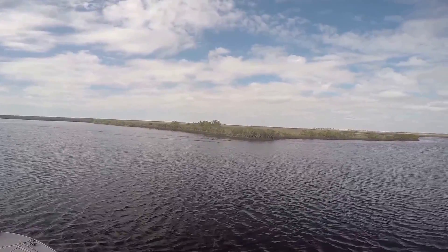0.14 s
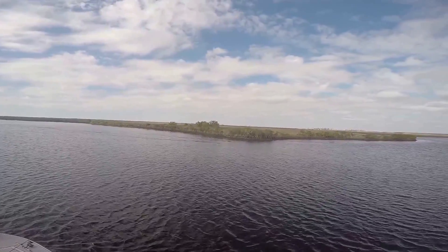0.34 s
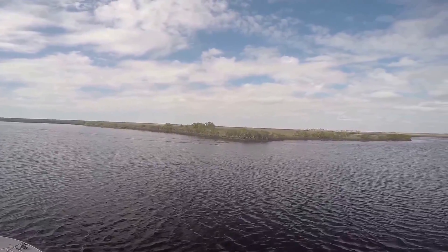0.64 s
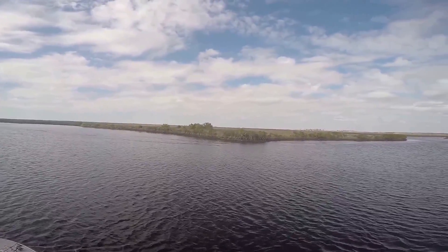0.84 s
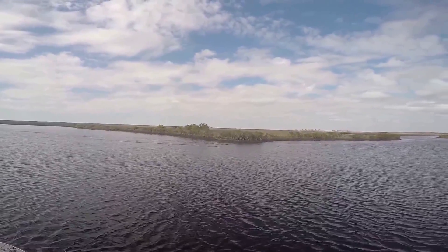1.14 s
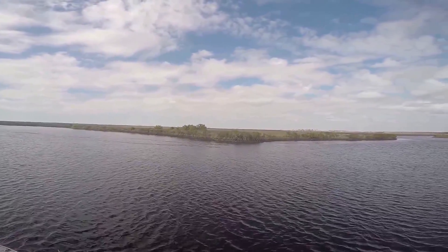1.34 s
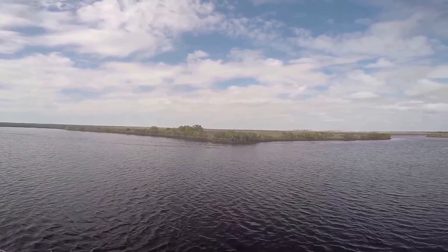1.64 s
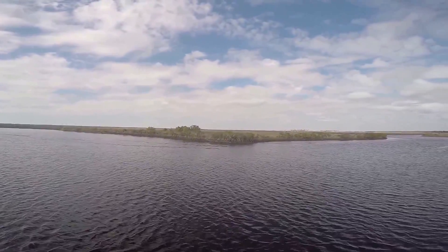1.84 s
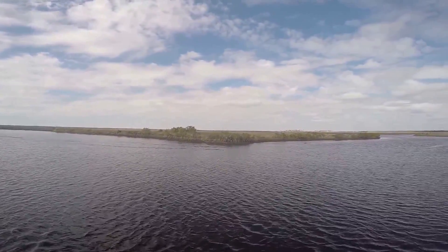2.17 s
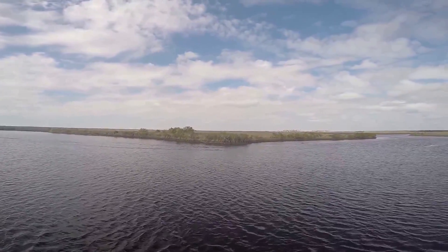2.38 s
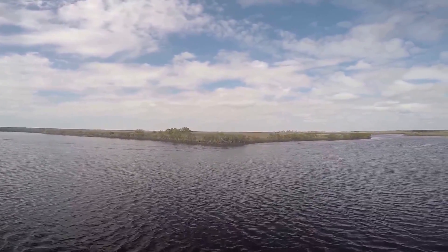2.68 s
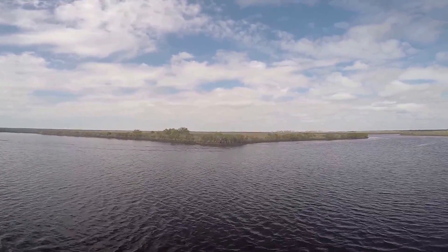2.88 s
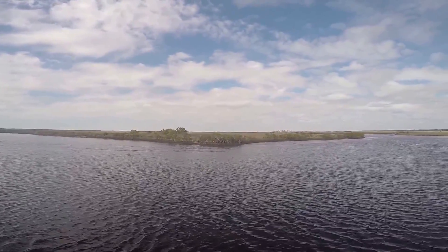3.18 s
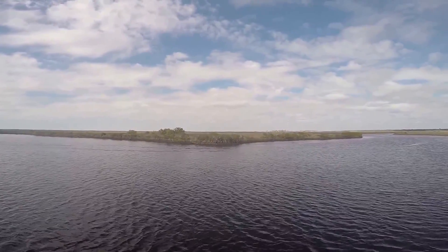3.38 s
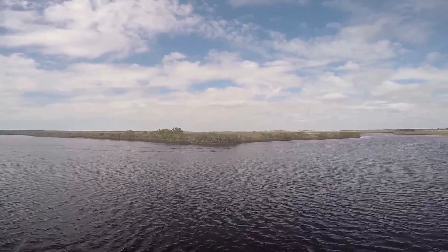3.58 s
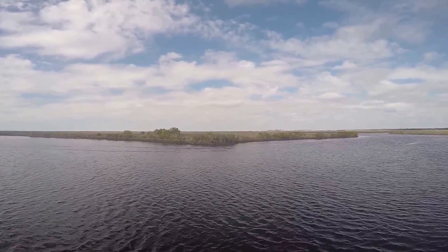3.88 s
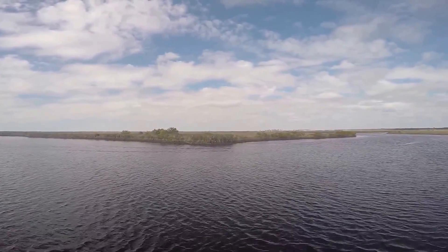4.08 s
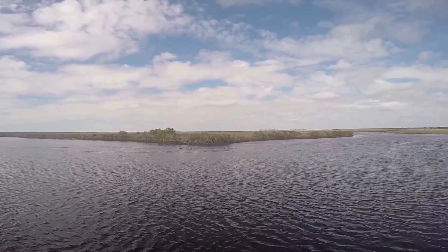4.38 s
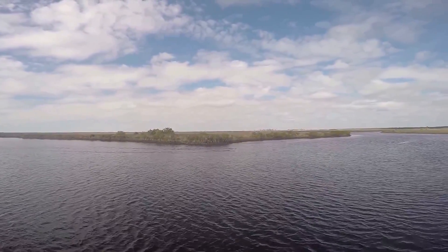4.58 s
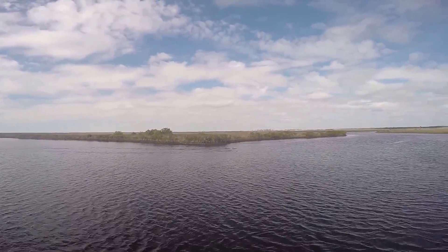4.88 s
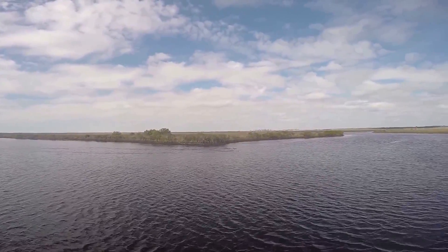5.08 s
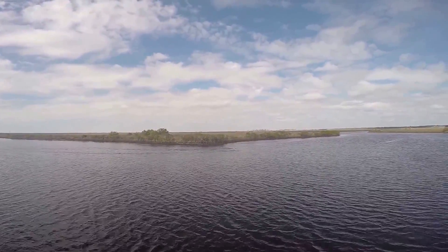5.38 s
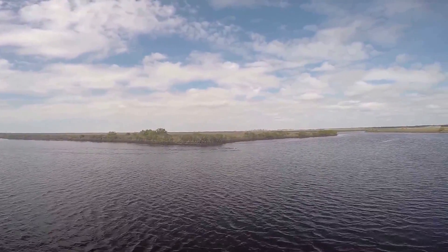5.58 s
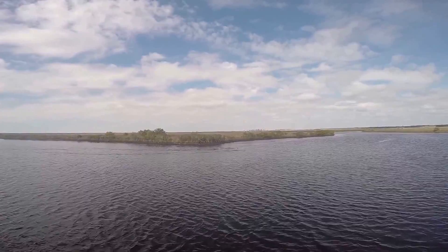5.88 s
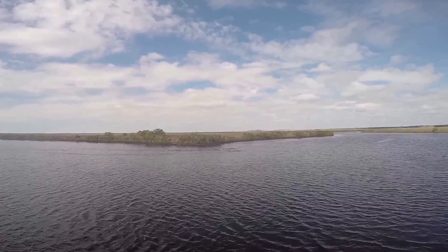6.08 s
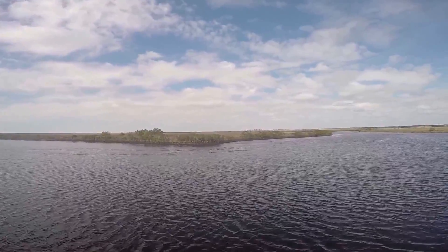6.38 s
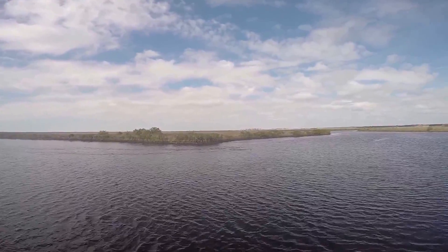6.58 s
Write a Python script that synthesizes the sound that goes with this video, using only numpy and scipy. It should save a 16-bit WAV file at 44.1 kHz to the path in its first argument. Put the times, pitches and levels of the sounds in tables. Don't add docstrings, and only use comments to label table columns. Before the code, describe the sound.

Low water rumble, soft slaps, gurgle and faint surging wash run throughout, with slight hiss. From about three quarters of a second, uneven knocks dominate: bassy thumps topped by tiny scratchy plastic clicks, varying in strength and brightness. They come quickly at first, then clicks weaken and gaps widen, dull muffled bumps joining late. Close, boxy, muffled mono sound, outdoors on the water, no echo.

```python
import sys
import numpy as np
from scipy import signal
from scipy.fft import rfft, irfft, next_fast_len
from scipy.io import wavfile
from scipy.ndimage import uniform_filter1d, map_coordinates

SR = 44100
rng = np.random.default_rng(int(sys.argv[2]) if len(sys.argv) > 2 else 0)


def volts(x):
    e = np.asarray(x, float) / 20
    return 10 ** e


def master(y):
    cut = np.clip(np.atleast_2d(y).T, -1, 1)
    pcm = np.round(cut * 32767)
    wavfile.write(sys.argv[1], SR, pcm.astype(np.int16))


N = 296616


def unit(x):
    return x / np.sqrt(np.mean(x ** 2) + 1e-20)


def wobble(rate):
    points = rng.standard_normal(int(N * rate / SR) + 4)
    return map_coordinates(points, [np.arange(N) * rate / SR])


def filtered(x, response):
    m = next_fast_len(N + 8192)
    return irfft(rfft(x, m) * response(np.fft.rfftfreq(m, 1 / SR)), m)[:N]


def ringing(x, modes):
    def shape(f):
        total = 0
        for k, (centre, width, db) in enumerate(modes):
            damping = 1j * f * width
            total = total + (-1) ** k * volts(db) * damping / (centre ** 2 - f ** 2 + damping)
        return total
    return filtered(x, lambda f: shape(f) / np.sqrt(np.mean(np.abs(shape(f)) ** 2)))


def push(ms):
    return np.hanning(max(round(ms * SR / 1000), 3))


def rush(spectrum, patchy_db):
    z = signal.stft(rng.standard_normal(N), nperseg=512)[2]
    patches = uniform_filter1d(rng.standard_normal(z.shape), size=6, axis=0)
    patches = uniform_filter1d(patches, size=8, axis=1)
    noise = signal.istft(z * volts(patchy_db * unit(patches)), nperseg=512)[1][:N]
    f, level = np.transpose(spectrum)

    def colour(hz):
        return volts(np.interp(np.log(hz + 1), np.log(f), level, left=-120, right=-120))
    return unit(filtered(noise, colour))


# (time [s], strength [dB], stiffness [pitch ratio], push length [ms])
JOLTS = [(0.7564, -8.2, 0.986, 15.2), (0.962, -9.0, 0.982, 3.0), (1.1457, -11.2, 1.104, 22.0),
         (1.3563, -13.3, 1.067, 3.0), (1.5337, -10.7, 0.984, 3.0), (1.7344, -10.8, 1.045, 8.3),
         (1.9228, -14.9, 1.017, 3.0), (2.1541, -14.2, 1.027, 3.0), (2.5666, -10.7, 0.995, 3.0),
         (2.7677, -13.0, 0.98, 9.1), (2.9755, -12.6, 1.089, 20.5), (3.1997, -13.5, 1.004, 7.8),
         (3.414, -15.9, 1.052, 5.9), (3.64, -15.9, 0.995, 19.2), (3.9005, -15.3, 0.993, 3.0),
         (4.113, -14.3, 0.993, 3.0), (4.3274, -13.2, 1.023, 7.6), (4.5829, -28.8, 1.097, 3.0),
         (4.7728, -10.4, 1.029, 3.0), (4.9721, -11.6, 1.011, 20.9), (5.2231, -13.1, 1.004, 3.0),
         (5.4567, -9.5, 1.035, 19.4), (5.9412, -11.0, 1.15, 24.1), (6.4447, -5.9, 0.983, 12.4)]
# (pitch [Hz], share [amplitude], time to fall 60 dB [s])
HULL_MODES = [(21.9, -.787, .216), (49.6, -3.3, .145), (41.85, 4.63, .084)]


def thumps():
    out, t = np.zeros(N + SR), np.arange(SR // 4) / SR
    for s, db, stiff, ms in JOLTS:
        ring = np.zeros(len(t))
        for hz, share, t60 in HULL_MODES:
            ring += share * np.sin(2 * np.pi * hz * stiff * t) * volts(-60 * t * stiff / t60)
        force = push(ms)
        thump = signal.fftconvolve(ring, force / force.sum())[:len(t)]
        out[round(s * SR):][:len(t)] += volts(db) * thump
    return out[:N]


# (time of peak [s], level [dB], rise [ms], fall [ms], wall part [dB])
GRATES = [(0.7608, -38, 3.6, 7.6, 4), (0.9611, -28, 2.1, 8.7, -7), (1.1499, -27.5, 1.4, 8, -7.5),
          (1.3525, -24.5, 1.8, 8.4, -0.5), (1.534, -25.5, 4.9, 6.1, -2), (1.7375, -27.5, 10.1, 4.4, -5),
          (1.9224, -34.5, 4.8, 7, -1.5), (2.1563, -23.5, 2.4, 2.9, 5), (2.564, -34, 2.4, 11.8, -2),
          (2.768, -28.5, 5.9, 11.1, -9), (2.985, -31, 12.8, 6.9, -13), (3.1958, -23, 0.83, 12, -9),
          (3.4076, -28, 13.6, 10.3, -6.5), (3.643, -36.5, 11.5, 15, -8), (3.893, -30.5, 3.6, 12.2, -1),
          (4.112, -33, 10, 8.5, -1), (4.3301, -31, 7.3, 4.6, 1.5), (4.774, -39.5, 12, 8.5, -8),
          (4.975, -40.5, 1.8, 16.6, -9), (5.2214, -39.5, 1.47, 11.4, 2), (5.946, -34.5, 4, 5.9, 8),
          (6.171, -42.5, 3.7, 4.2, 9.5), (6.4409, -32, 3.5, 2.3, 2)]
# (time of peak [s], level [dB], rise [ms], fall
# [ms], bright part [dB])
MORE_GRATES = [(0.845, -65, 3.7, 5.0, -1), (0.959, -38.5, 1.1, 12, -32), (3.345, -47, 6.8, 8.0, -15),
               (3.871, -42, 3.8, 10, -7), (4.548, -39.5, 4.5, 17, -23), (4.7683, -34, 1.6, 2.2, -36),
               (4.9545, -49, 1.0, 28, -13), (5.4424, -56, 2.1, 2.8, -16), (5.458, -45, 2.2, 18, -8.5),
               (5.47, -43.5, 2.8, 2.1, -18), (5.656, -46, 11.8, 18, -12), (5.929, -44.5, 4.1, 22.5, -2),
               (6.1575, -53, 1.14, 25.6, -6), (6.185, -47, 5.2, 16, -8), (6.4484, -36.5, 3.5, 8.3, -4.5),
               (6.629, -62.5, 18, 14, -5.7)]


def contacts():
    touches = []
    for s, db, rise, fall, wall_db in GRATES:
        bright_db = -12.5 + 0.21 * rise - 0.07 * (db + 30)
        touches.append((s, db, rise, fall, bright_db, wall_db))
    for s, db, rise, fall, bright_db in MORE_GRATES:
        wall_db = 8 - 0.44 * (rise + fall)
        touches.append((s, db, rise, fall, bright_db, wall_db))
    return np.array(touches)


def muffled(x, hz):
    return signal.sosfilt(signal.butter(N=6, Wn=hz, fs=SR, output="sos"), x)


# (centre [Hz], width [Hz], level [dB])
CASE_DULL = [(980, 680, -6.5), (1430, 380, 1.5), (2110, 270, -3.5)]
CASE_WALL = [(2665, 150, 0)]
CASE_MAIN = [(3480, 586, 14), (4040, 290, -3), (4250, 180, -1)]
CASE_BRIGHT = [(5330, 67, -49), (5850, 1000, -3), (7120, 280, -3), (7213, 436, 7)]
CASE_AIR = [(9200, 1200, 0.5), (10850, 400, -1), (12100, 1200, -7.5), (13500, 500, -12)]


def grating():
    t = np.arange(N) / SR
    swell = np.zeros((3, N))
    for s, db, rise, fall, bright_db, wall_db in contacts():
        near = slice(max(round(s * SR) - 4410, 0), round(s * SR) + 4410)
        width = np.where(t[near] < s, rise, fall) / 1000
        levels = volts([[db], [db + bright_db], [db + wall_db]])
        swell[:, near] += np.exp(-((t[near] - s) / width) ** 2) * levels

    sizes = volts(4.5 * rng.exponential(size=N).clip(0, 3))
    slips = (rng.random(N) < 0.15) * rng.standard_normal(N) * sizes
    slips = unit(slips) + 0.57 * rng.standard_normal(N)
    slips = slips / np.sqrt(np.abs(uniform_filter1d(slips ** 2, size=130)))
    slips = slips * volts(1.46 * wobble(130))

    main = volts(0.8) * ringing(slips * swell[0], CASE_MAIN)
    dull = volts(-14) * ringing(slips * swell[0], CASE_DULL)
    bright = volts(2.5) * ringing(slips * swell[1], CASE_BRIGHT)
    air = volts(-13.5) * ringing(slips * swell[1], CASE_AIR)
    wall = volts(-12) * ringing(ringing(slips * swell[2], CASE_WALL), [(3040, 1100, 0)])
    case = muffled(main + wall + dull, hz=4810) + muffled(bright, hz=8240) + muffled(air, hz=13800)

    dip_hz, dip_width_hz, dip_depth = 5220, 1000, 0.37

    def port(f):
        damping = 1j * f * dip_width_hz
        return 1 - dip_depth * damping / (dip_hz ** 2 - f ** 2 + damping)
    return filtered(case, port)


# (time of contact [s], level [dB], pitch [Hz])
KNOCKS = [(0.761, -45.5, 2105), (0.961, -50, 980), (0.961, -41, 2116), (1.15, -46.1, 1890),
          (1.352, -47, 720), (1.352, -50, 1656), (1.534, -49, 1925), (1.534, -44.5, 593), (1.737, -55, 746),
          (1.737, -44, 1464), (1.922, -49.5, 1626), (2.156, -33.5, 1430), (2.564, -46.5, 1456),
          (2.768, -47, 1527), (2.986, -44.5, 4170), (3.196, -50, 939), (3.196, -54, 1940),
          (4.548, -52.5, 640), (4.548, -47.5, 4183), (4.775, -47.5, 1458), (5.221, -47, 2040),
          (5.221, -46.5, 4409), (5.221, -48, 692), (5.458, -53.5, 2120), (5.946, -42, 2060),
          (6.158, -46, 4340), (6.441, -39.5, 1984), (6.448, -52.5, 690), (6.448, -44, 4400),
          (6.448, -46, 1990)]


def knocks():
    out, touches = np.zeros(N), contacts()
    for (s, db, hz), start in zip(KNOCKS, rng.random(len(KNOCKS))):
        nearest = np.abs(touches[:, 0] - s).argmin()
        peak, _, rise, fall = touches[nearest, :4]
        shape = push(1.35 * (rise + fall))
        drift = np.cumsum(rng.standard_normal(SR // 10))[:len(shape)] * 0.069 * hz / 1500
        tone = np.sin(2 * np.pi * (hz * np.arange(len(shape)) / SR + start) + drift)
        middle = peak + (fall - rise) / 2 / 1000
        out[round(middle * SR) - len(shape) // 2:][:len(shape)] += volts(db + 8) * shape * tone
    return out


# (time [s], level [dB], length [ms], direction [+1 or -1])
TAPS = [(4.557, -18.5, 10.3, 1), (4.5615, -22.5, 1.6, -1), (4.568, -23, 5.6, 1), (4.594, -12.5, 16, 1),
        (5.2297, -23, 0.61, -1), (5.236, -18, 5.5, 1), (5.746, -24, 10.6, -1), (5.757, -14.5, 16, 1),
        (5.768, -16, 15.6, -1), (6.301, -20, 15.5, -1), (6.311, -24, 10, 1)]


def taps():
    out = np.zeros(N)
    for s, db, ms, sign in TAPS:
        force = push(ms)
        out[round(s * SR) - len(force) // 2:][:len(force)] += sign * volts(db) * force
    return filtered(out, lambda f: 1j * f / (60 + 1j * f))


# (time [s], level [dB])
FLOW = [(0.0, -62.5), (0.6, -55.5), (0.99, -59), (1.23, -53), (1.68, -51.5), (2.2, -56.5), (2.43, -56),
        (2.55, -51.5), (3.3, -48.5), (3.43, -56), (3.86, -50), (4.2, -52), (4.48, -51), (5.06, -53.5),
        (5.5, -66.5), (5.68, -55.5), (5.94, -54.5), (6.35, -63.5)]
# (time [s], level [dB])
CHOP = [(0.0, -49), (0.52, -47), (0.97, -45.5), (1.31, -43), (1.54, -38), (2.28, -47), (2.45, -47.5),
        (2.6, -40), (3.65, -42.5), (3.93, -40.5), (5.17, -43.5), (5.24, -44), (6.61, -47.5), (6.73, -43.5)]
# (frequency [Hz], level [dB])
RUMBLE = [(10, -57), (20, -13.5), (36, -8.5), (49, -6), (61, -9.5), (72, -23), (90, -51)]
SLAP = [(55, -30), (72, -1.5), (92, -1.5), (108, -6), (135, -19.5), (200, -31)]
GURGLE = [(90, -39), (140, 1.5), (220, -2.5), (370, -9), (540, -18), (700, -11), (1000, -12.5),
          (1500, -16.5), (2000, -17), (2600, -52)]
WASH = [(1200, -6.5), (2050, -5), (2250, 3), (2500, 2.5), (2900, 1), (3400, -0.5), (4000, -8.5),
        (4450, -11.5), (4800, -27), (5500, -24.5), (7000, -31), (9000, -45)]


def water():
    t = np.arange(N) / SR
    flow_db = np.interp(t, *np.transpose(FLOW))
    chop_db = np.interp(t, *np.transpose(CHOP))

    def follow(db, share):
        return db.mean() + share * (db - db.mean())

    rumble = unit(volts(0.4 * wobble(9)) * rush(RUMBLE, patchy_db=1.77))
    slap = unit(volts(1.7 * wobble(12)) * rush(SLAP, patchy_db=1.36))
    gurgle = unit(volts(0.75 * wobble(25)) * rush(GURGLE, patchy_db=1.0))
    surges = volts(0.8 * wobble(14) + 1.6 * wobble(70))
    wash = unit(surges * rush(WASH, patchy_db=1.1))

    rumble = rumble * volts(follow(chop_db, share=0.43) + 7.5)
    slap = slap * volts(follow(chop_db, share=0.84) + 2)
    gurgle = gurgle * volts(follow(flow_db, share=0.42) + 4.5)
    wash = wash * volts(flow_db + 1.34)
    return rumble + slap + gurgle + wash


# (frequency [Hz], level [dB])
HISS = [(1500, -30), (4000, 1.5), (7500, -4.5), (11000, -4.5), (13500, -6.5), (14200, -8), (15300, -13)]


def hiss():
    return volts(-69) * rush(HISS, patchy_db=2.5)


def scene():
    return (thumps() + grating() + knocks() + taps() + water())[None]


def top_cut(x):
    return signal.sosfilt(signal.butter(12, 15400, fs=SR, output="sos"), x)


def record(dry):
    mix = filtered(dry[0] + hiss(), lambda hz: hz < 15350)[None]
    return top_cut(mix)


dry = scene()
out = record(dry)
master(out)
```